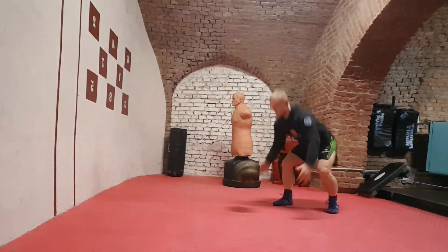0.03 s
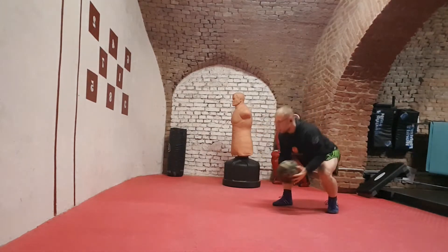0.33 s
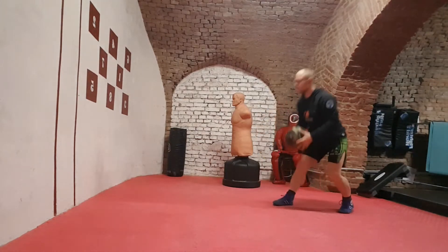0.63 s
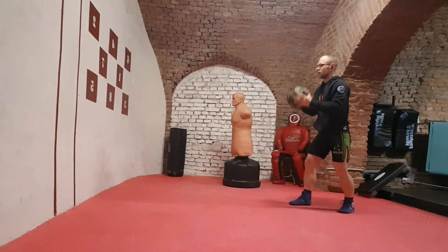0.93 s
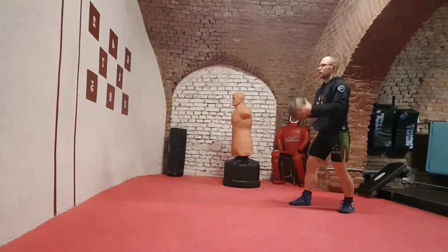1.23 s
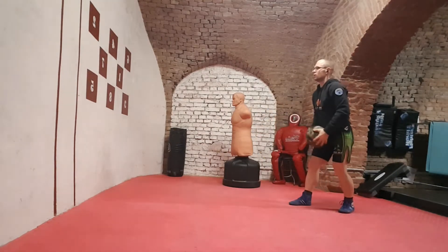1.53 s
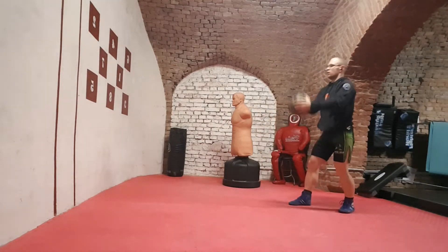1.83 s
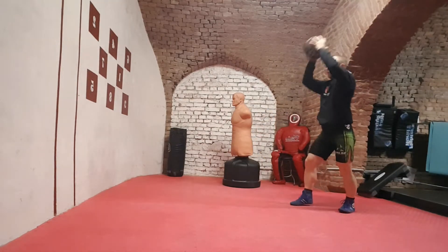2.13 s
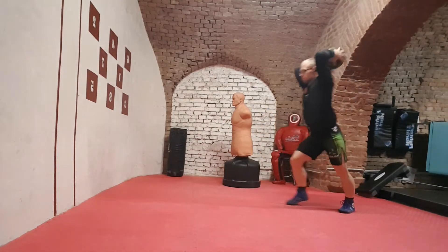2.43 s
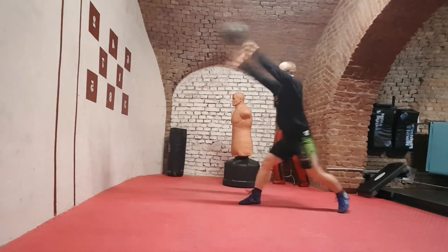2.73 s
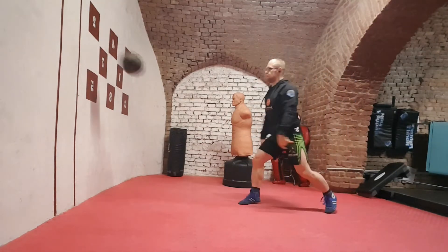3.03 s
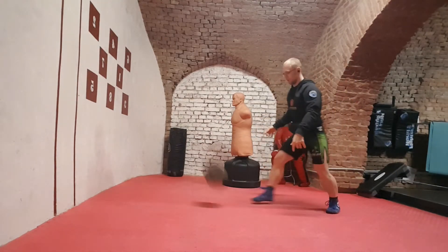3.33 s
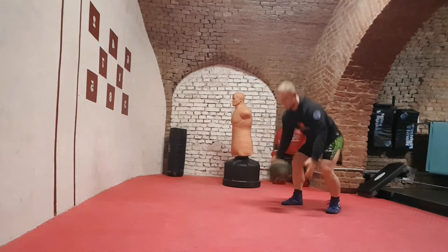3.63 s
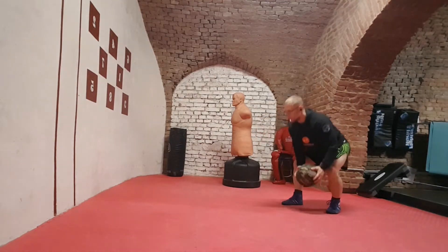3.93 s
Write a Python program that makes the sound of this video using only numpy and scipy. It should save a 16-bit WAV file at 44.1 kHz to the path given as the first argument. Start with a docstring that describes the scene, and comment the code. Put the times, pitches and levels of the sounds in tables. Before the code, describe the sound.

Heavy rubber ball bouncing, slapping into hands and thudding off a wall in an echoing room.

```python
"""A heavy rubber medicine ball in a brick-vaulted gym, heard on a pair of unlike microphones.
It bounces on the matted floor and is caught, then is thrown with a lunge, slams into the wall,
bounces with a hollow ping and is caught again; wall and floor set the room's low modes booming.
Near the microphones, clothes swish between the throws; ventilation rumbles steadily from the right."""
import sys
import numpy as np
from scipy import signal
from scipy.fft import rfft, irfft, next_fast_len
from scipy.io import wavfile

SR = 44100
rng = np.random.default_rng(int(sys.argv[2]) if len(sys.argv) > 2 else 0)


def log_audio(samples):
    """Write samples as a 16-bit WAV file to the path given in sys.argv[1]."""
    # one column per channel
    frames = np.atleast_2d(samples).T
    # limit to full scale, then quantise
    limited = np.clip(frames, -1, 1)
    pcm = np.round(limited * 32767).astype(np.int16)
    wavfile.write(sys.argv[1], SR, pcm)


N = 176400
T = np.arange(int(1.4 * SR)) / SR  # seconds since a contact


def amp(db):
    """Decibels to gain."""
    return 10 ** (np.asarray(db) / 20)


def along(points, hz):
    """Read a curve of (freq_hz, value) points on a log axis."""
    freqs, values = np.transpose(points)
    return np.interp(np.log(hz + 1), np.log(freqs + 1), values)


def filtered(x, response):
    """Shape x by a frequency response."""
    n = x.shape[-1]
    size = next_fast_len(n + SR // 2)
    return irfft(rfft(x, size) * response(np.fft.rfftfreq(size, 1 / SR)), size)[..., :n]


def add(out, start_s, x):
    """Mix x into out from start_s on."""
    i = round(start_s * SR)
    x = x[..., max(-i, 0):N - i]
    out[:, max(i, 0):max(i, 0) + x.shape[-1]] += x


def stereo_noise(n, likeness):
    """White noise with a given left-right likeness at each frequency."""
    def mid_side_gains(hz):
        angle = np.arccos(np.clip(along(likeness, hz), -1, 1)) / 2
        return np.array([np.cos(angle), np.sin(angle)])
    mid, side = filtered(rng.standard_normal((2, n)), mid_side_gains)
    return np.array([mid + side, mid - side])


def contact(spectrum, tilt_db=0, size=8192):
    """One impact: a minimum-phase pulse of energy 1, its spectrum tilted by tilt_db per octave."""
    hz = np.fft.rfftfreq(size, 1 / SR)
    cepstrum = irfft(np.log(amp(along(spectrum, hz) + tilt_db * np.log2(hz + 1))))
    cepstrum[1:size // 2] *= 2
    cepstrum[size // 2 + 1:] = 0
    pulse = irfft(np.exp(rfft(cepstrum)))
    return pulse / np.linalg.norm(pulse)


def mode(hz, db, t60_s, rise_s):
    """One damped resonance."""
    envelope = np.exp(-np.log(1000) * T / t60_s) * (1 - np.exp(-T / rise_s))
    return amp(db) * np.sin(2 * np.pi * hz * T) * envelope


def at_microphones(pulse, tail, paths):
    """A pulse reaches the pair by distinct paths and a diffuse tail."""
    room = tail.copy()
    for delay_s, db, left_lag_s in paths:
        room[0, round((delay_s + max(left_lag_s, 0)) * SR)] += amp(db)
        room[1, round((delay_s + max(-left_lag_s, 0)) * SR)] += amp(db)
    return signal.fftconvolve(pulse[None], room, axes=1)[:, :len(T)]


# Air noise, off to the right: freq_hz, level_db
VENT_SPECTRUM = [(15, -46), (25, -18), (49, -12), (81, -9.5), (127, 0), (166, -8.5), (194, -0.5),
                 (228, -12.5), (331, -6), (368, -13.5), (399, -17.5), (493, -9.5), (534, -12), (910, -15.5),
                 (1100, -20.5), (2310, -26.5), (5130, -45), (8980, -62.5), (14500, -58.5)]
# The same air across the pair: freq_hz, likeness
VENT_LIKENESS = [(60, 1), (150, 0.87), (370, 0.79), (920, 0.076), (2290, 0.12), (5690, -0.065),
                 (14200, 0.79)]

def ventilation(level_db=-37.5, left_lag_s=.0004):
    """Steady air noise reaches the right microphone first."""
    lags_s = np.array([[left_lag_s], [0]])
    air = filtered(stereo_noise(N, VENT_LIKENESS),
                   lambda hz: amp(along(VENT_SPECTRUM, hz)) * np.exp(-2j * np.pi * hz * lags_s))
    return amp(level_db) * air / np.sqrt(np.mean(air ** 2))


# Decay under the brick vault: freq_hz, t60_s
VAULT_DECAY = [(40, 3.25), (160, 1), (420, 1.06), (1100, 0.73), (2900, 0.63), (7000, 0.52), (14000, 0.46)]
# Diffuse sound across the pair: freq_hz, likeness
ROOM_LIKENESS = [(60, 0.89), (150, 0.83), (300, 0.83), (600, 0.8), (1100, 0), (4000, 0.037), (12000, 0)]

def vault(lift_db=0, lift_s=.1, gap_s=.0057):
    """A fresh room tail; with lift, its gain rises at first, like a limiter recovering after a slam."""
    hz, t, bands = signal.stft(stereo_noise(len(T), ROOM_LIKENESS), SR, nperseg=512)
    decay = amp(-60 * t / along(VAULT_DECAY, hz)[:, None])
    tail = signal.istft(bands * decay, SR, nperseg=512)[1][:, :len(T)]
    onset = 1 - np.exp(-(T / gap_s) ** 2)
    return tail * onset * amp(lift_db * np.minimum(T / lift_s, 1))


# Clothes, near the microphones: peak_s, rise_s, fall_s, level_db
SWISHES = [(.63, 0.2, 0.08, -58), (.84, 0.069, 0.12, -64), (.965, 0.068, 0.093, -61),
           (1.2, 0.11, 0.37, -69.5), (1.97, 0.097, 0.26, -69.5), (2.8, 0.054, 0.042, -51.5),
           (2.96, 0.037, 0.071, -54.5)]
# Rubbing fabric: freq_hz, level_db
CLOTH_SPECTRUM = [(300, -34), (2000, 7), (4500, 3), (8000, -1), (10000, -2.5), (14500, -4)]

def clothes():
    """Fabric slides over itself with each lift and swing."""
    t = np.arange(N) / SR
    envelope = sum(amp(db) * np.exp(np.minimum((t - peak_s) / rise_s, (peak_s - t) / fall_s))
                   for peak_s, rise_s, fall_s, db in SWISHES)
    hiss = filtered(stereo_noise(N, ROOM_LIKENESS), lambda hz: amp(along(CLOTH_SPECTRUM, hz)))
    return envelope * hiss / np.sqrt(np.mean(hiss ** 2))


# Shoe on the mat: start_s, level_db
STEPS = [(2.768, -38), (2.787, -49), (2.9, -45.5)]
# Its dull tap: freq_hz, level_db
STEP_SPECTRUM = [(25, -11), (70, 2), (200, -11), (600, -4), (1500, -10.5), (2600, -20.5), (5000, -46),
                 (14000, -44)]

def steps():
    """The front foot lands on the soft mat in the lunge and takes the weight."""
    out = np.zeros((2, N))
    paths = [(0, 28.3, .021), (.003, 23, 0)]  # delay_s, gain_db, left_lag_s
    for start_s, db in STEPS:
        add(out, start_s, amp(db) * at_microphones(contact(STEP_SPECTRUM), vault(), paths))
    body_weight = mode(hz=66, db=-30, t60_s=.35, rise_s=.025)
    add(out, STEPS[1][0] + .012, body_weight)
    return out


# Ball into the hands: start_s, slap_db, tilt_db_per_octave, knock_hz, knock_db
CATCHES = [(.259, -32, 0.63, 502, -27), (.298, -41, 2.2, 694, -30.5), (3.7835, -25.5, 1, 240, -13)]
# Palms on rubber: freq_hz, level_db
PALM_SPECTRUM = [(25, -24.5), (60, 5), (120, -4), (200, -5), (300, -7.5), (470, -17), (900, -12.5),
                 (1200, -19), (1750, -23.5), (2250, -18.5), (3100, -29), (6000, -38.5), (10000, -43.5),
                 (14500, -49.5)]
# From the hands to the microphones: delay_s, gain_db, left_lag_s
HAND_PATHS = [(0, 20, 0), (.003, 24, 0), (.038, 12, 0)]

def catches():
    """Two palms meet the ball with a hollow knock; the fingers close with a brief patter."""
    out = np.zeros((2, N))
    for start_s, slap_db, tilt_db, knock_hz, knock_db in CATCHES:
        fingers = amp(5) * np.exp(-T / .0079) * stereo_noise(len(T), ROOM_LIKENESS)
        slap = at_microphones(contact(PALM_SPECTRUM, tilt_db), vault() + fingers, HAND_PATHS)
        knock = mode(knock_hz, knock_db, t60_s=.029, rise_s=.0009)
        echo = amp(-31) * at_microphones(knock, vault(), [])
        add(out, start_s, amp(slap_db) * slap + knock + echo)
    return out


# Ball on the wall, first touch and full flattening: start_s, level_db
SLAMS = [(2.9989, -17), (3.0008, -19.5)]
# Rubber on the wall: freq_hz, level_db
SLAM_SPECTRUM = [(25, -44), (45, -10), (70, -9), (130, -9), (200, -10.5), (350, -14.5), (400, -21),
                 (490, -15.5), (570, -20), (700, -15.5), (1000, -18), (1450, -20), (1830, -23), (2450, -20),
                 (3780, -28.5), (7000, -37.5), (14500, -49)]
# From the wall to the microphones: delay_s, gain_db, left_lag_s
WALL_PATHS = [(0, 25, -.0002), (0.0121, 18.5, .0002), (.017, 12, -.0002), (.034, 12, 0)]
# The thump and its returns from floor and vault: delay_s, gain_db
THUMP_ECHOES = [(.001, 2.5), (.046, -2), (.073, -2), (.088, -5), (.123, -5), (.178, -9)]
# Room modes woken at the wall: pitch_hz, level_db, t60_s, rise_s
WALL_MODES = [(57.5, -27, .9, 0.025), (69, -31, .9, 0.086), (88.6, -18, 1, 0.033),
              (113.65, -15.5, 0.99, 0.022), (128.9, -17, 1, 0.034), (201.5, -28.5, 0.98, 0.033)]

def slams():
    """The ball cracks and thumps against the wall, which shakes the room's low modes."""
    out = np.zeros((2, N))
    crack = contact(SLAM_SPECTRUM)
    for start_s, db in SLAMS:
        add(out, start_s, amp(db) * at_microphones(crack, vault(lift_db=3, lift_s=.2), WALL_PATHS))
    touch_s = SLAMS[0][0]
    thump = mode(hz=78, db=-5, t60_s=.11, rise_s=.0015)
    for delay_s, db in THUMP_ECHOES:
        add(out, touch_s + delay_s, amp(db) * thump)
    add(out, touch_s, sum(mode(*row) for row in WALL_MODES))
    return out


# Ball on the matted floor: start_s, level_db, pitch_ratio, boom_db, ring_tilt_db_per_octave
BOUNCES = [(-.0705, -19.5, 1.2, -6.5, 0), (3.4695, -15, 1.0, -9, -1)]
# Rubber on the mat: freq_hz, level_db
BOUNCE_SPECTRUM = [(25, -49), (60, -3.5), (110, -1.5), (270, -3.5), (480, -14.5), (700, -5), (1200, -2.5),
                   (1500, -5.5), (1750, -13.5), (2400, -15.5), (3000, -23), (3700, -22.5), (4500, -30.5),
                   (8000, -41), (10000, -49.5), (14500, -53)]
# From the floor to the microphones: delay_s, gain_db, left_lag_s
FLOOR_PATHS = [(0, 23, 0), (.0019, 22, 0), (.0036, 25, -.0004)]
# Air and shell of the ball: pitch_hz, level_db, t60_s
BALL_MODES = [(723, -11.5, 0.92), (849, -12.5, 0.93), (1080, -6, .25), (1110, 4, 0.23), (1163, -1, .42),
              (1290, -1.5, 0.64), (1347, -12.5, 0.24), (1526, -5, 0.17), (1900, -28, 0.15),
              (2385, -7, 0.088), (2642, -20.5, 0.14), (2910, -24.5, .35), (3284, -27.5, 0.24),
              (3540, -23, .2)]
# Room modes woken at the floor: pitch_hz, level_db, t60_s, rise_s
FLOOR_MODES = [(34, -17.5, 1.8, 0.049), (65.9, -11.5, 1.32, 0.069), (61.6, -22.5, 2.7, .05)]

def bounces(ping_hz=1180, boom_hz=63.5, swell_s=.054, drop_s=.034):
    """A slap, the ball's hollow ping and ring, and a boom that builds between floor and vault."""
    out = np.zeros((2, N))
    swell = np.interp(T, [0, swell_s], [.27, 1])
    drop = np.exp(-(np.maximum(T - swell_s, 0) / drop_s) ** 2)
    boom = swell * drop * np.sin(2 * np.pi * boom_hz * T) + sum(mode(*row) for row in FLOOR_MODES)
    ping = mode(ping_hz, db=15, t60_s=.024, rise_s=.002)  # the shell's first flex
    for start_s, db, pitch_ratio, boom_db, tilt_db in BOUNCES:
        pulse = contact([(hz * pitch_ratio, level_db) for hz, level_db in BOUNCE_SPECTRUM])
        slap = at_microphones(pulse, vault(), FLOOR_PATHS)
        ring = np.zeros(len(T))
        for hz, mode_db, t60_s in BALL_MODES:
            tilted_db = mode_db + tilt_db * np.log2(hz / ping_hz)
            ring += rng.choice([-1, 1]) * mode(hz * pitch_ratio, tilted_db, t60_s, rise_s=.0014)
        echo = at_microphones(ring * np.exp(-T / .026), vault(), [])  # the ring's onset fills the room
        echo *= amp(4.5) * np.linalg.norm(ring) / np.linalg.norm(echo[0])
        add(out, start_s, amp(db) * (slap + ping + amp(-10.5) * (ring + echo)))
        add(out, start_s + .0017, amp(boom_db) * boom)
    return out


# Treble colour of near sounds at the microphones: freq_hz, gain_db
PRESENCE = [(4000, 0.5), (5200, -1), (8000, 3), (9800, -2.5), (12500, 6.5), (14500, 4)]

def scene():
    """Ball and thrower over the steady ventilation."""
    action = slams() + bounces() + catches() + steps() + clothes()
    return ventilation() + filtered(action, lambda hz: amp(along(PRESENCE, hz)))


# Colour of the two microphones: freq_hz, left_minus_right_db
MIC_BALANCE = [(60, 5.5), (110, -2), (200, -0.5), (400, -4), (700, -5.5), (1250, -5), (2300, -5.5),
               (4200, -2), (6000, 2), (7700, 20), (10000, 27.5), (14200, 3.5)]

def record(dry, low_cut_hz=25, top_hz=14800):
    """Two unlike microphones, a low cut, soft overload and the band limit."""
    def microphones(hz):
        gains = amp(along(MIC_BALANCE, hz) * np.array([[.5], [-.5]]))
        return gains / np.sqrt(np.mean(gains ** 2, axis=0))
    low_cut = signal.butter(2, low_cut_hz, "highpass", fs=SR, output="sos")
    picked_up = signal.sosfilt(low_cut, filtered(dry, microphones))
    clipped = picked_up / (1 + np.abs(picked_up) ** 8) ** (1 / 8)
    return filtered(clipped, lambda hz: 1 / np.sqrt(1 + (hz / top_hz) ** 240))


dry = scene()
out = record(dry)
log_audio(out)
```